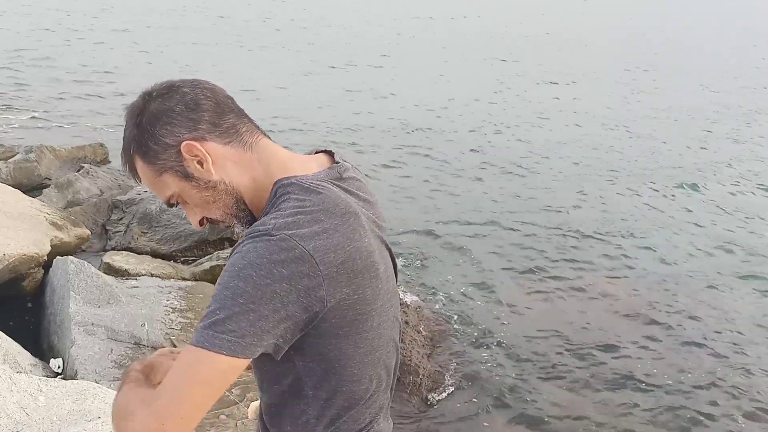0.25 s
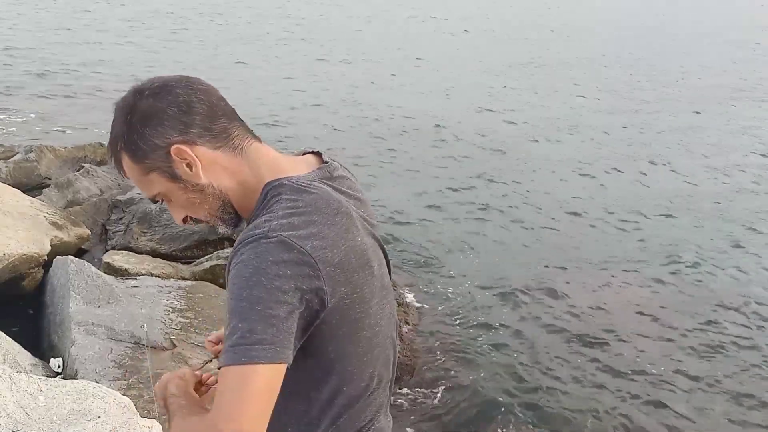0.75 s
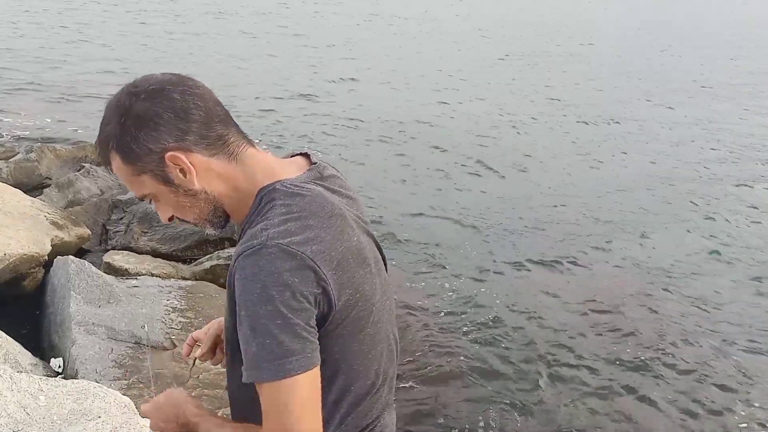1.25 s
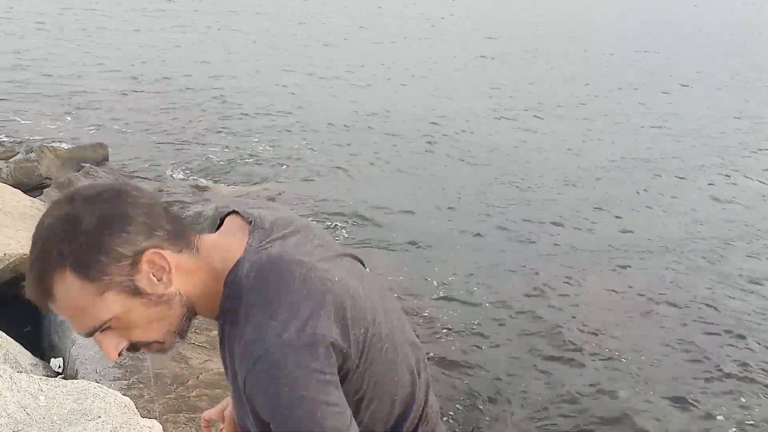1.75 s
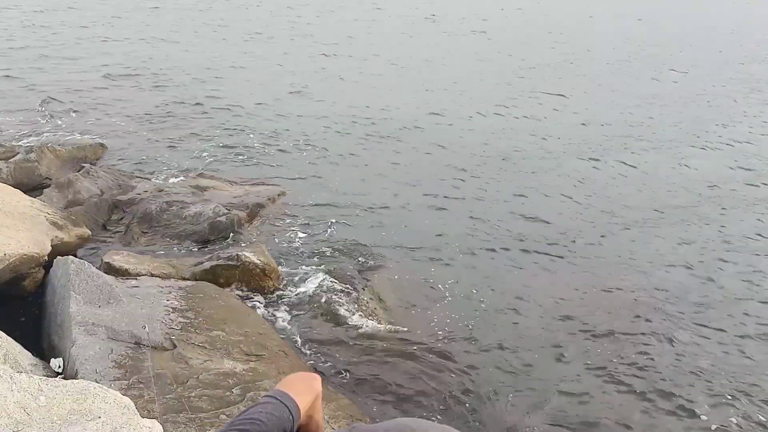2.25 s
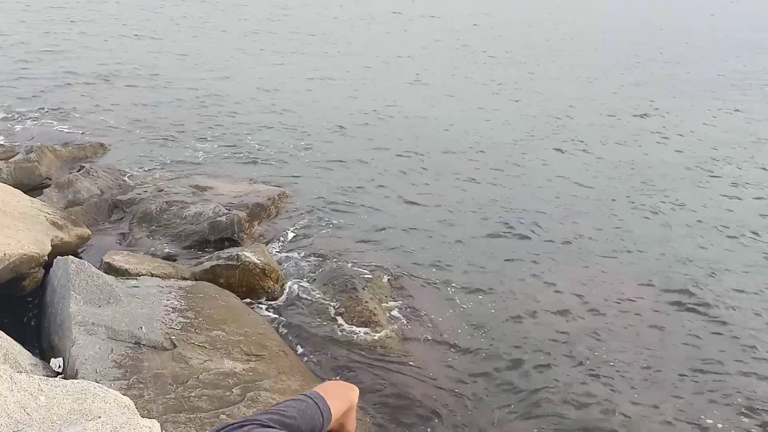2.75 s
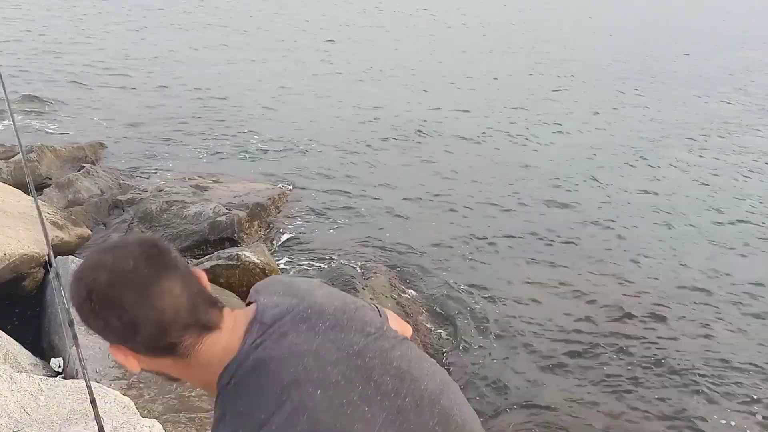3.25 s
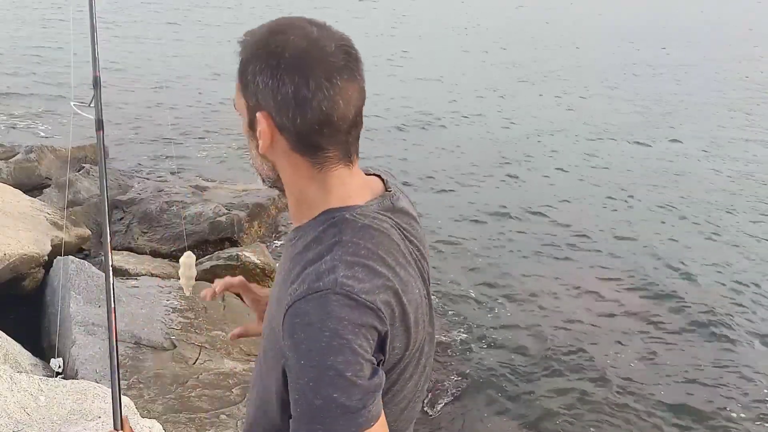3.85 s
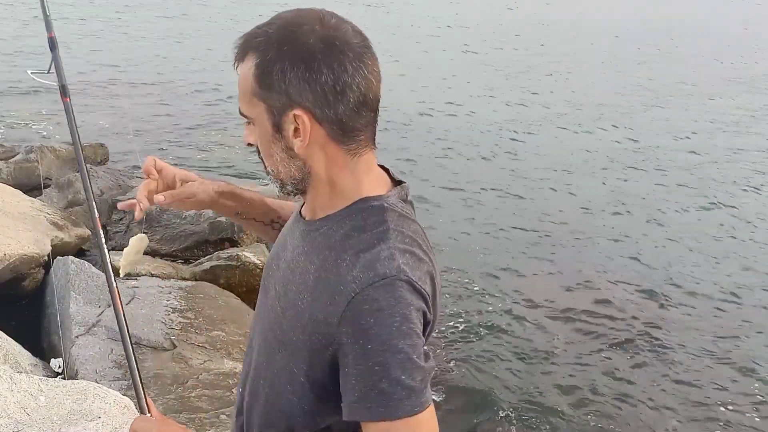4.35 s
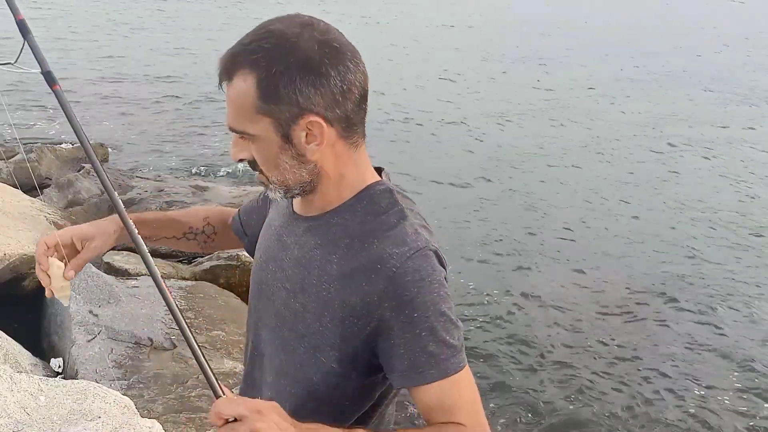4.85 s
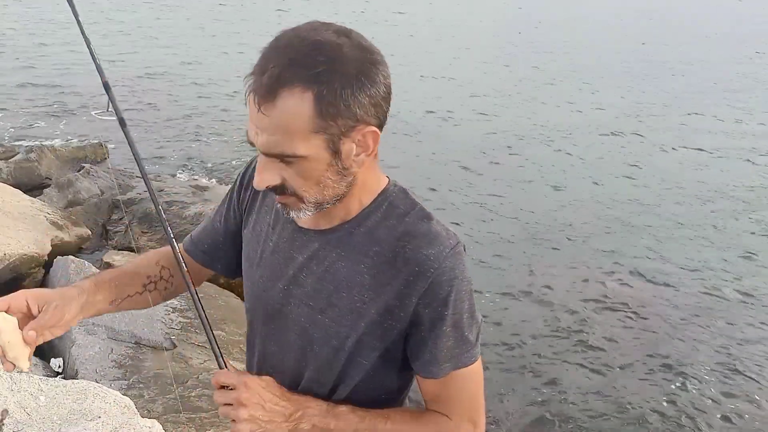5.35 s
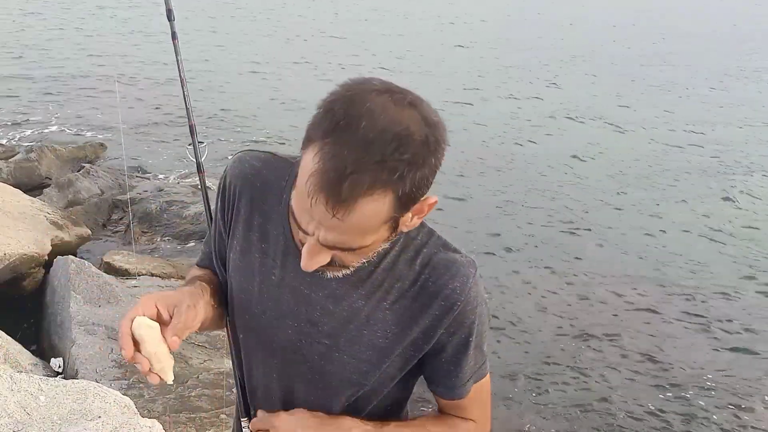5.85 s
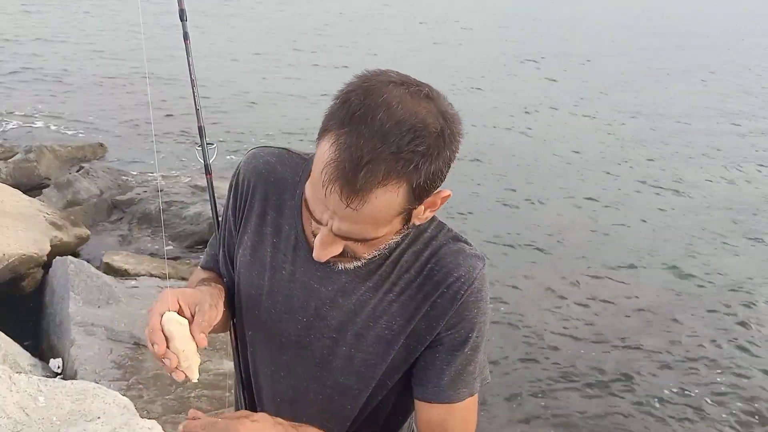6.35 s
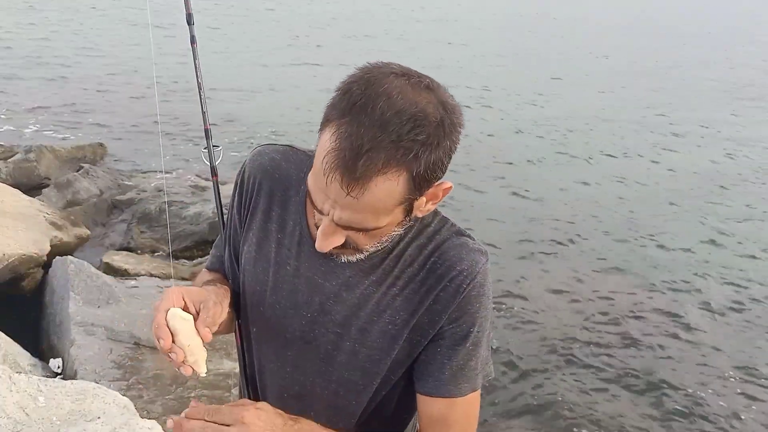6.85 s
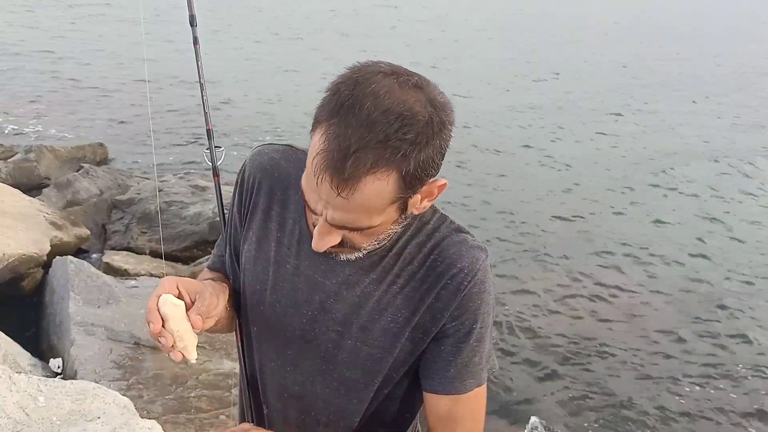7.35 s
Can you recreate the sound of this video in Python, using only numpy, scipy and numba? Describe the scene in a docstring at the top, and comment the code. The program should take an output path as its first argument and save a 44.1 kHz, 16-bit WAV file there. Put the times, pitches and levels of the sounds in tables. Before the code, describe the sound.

Gentle water washes among rocks, bubbling and plopping in uneven bursts, with crisp drips, a few tiny metallic ticks and soft breeze rumble.

```python
"""Among the rocks of a breakwater, small waves lap a few metres below two spaced microphone ports.
Filtered noise makes the wash, the breeze and the faint top hiss with its ticks; level curves move them.
Damped oscillators make the plops of trapped air, swarms of small bubbles, drops on stone,
pings of fishing tackle and thumps of wind; short noise bursts add slap and spit."""
import sys
import numpy as np
from scipy import signal
from scipy.fft import rfft, irfft, next_fast_len
from scipy.io import wavfile
from scipy.ndimage import uniform_filter1d
from numba import njit

SR = 44100
rng = np.random.default_rng(int(sys.argv[2]) if len(sys.argv) > 2 else 0)


def bounce(signal):
    """Save signal as a 16-bit WAV file at the path given by the first command-line argument."""
    frames = np.transpose(np.atleast_2d(signal))
    limited = np.clip(frames, -1, 1)
    pcm = np.round(limited * 32767).astype(np.int16)
    wavfile.write(sys.argv[1], SR, pcm)


N = 335601
PADDED = next_fast_len(N)  # transform length

# Strength of the breeze: (time [s], relative level [dB])
GUST_CURVE = [(0.0, -45.5), (0.45, -55), (1.0, -47), (1.7, -50), (1.95, -52), (2.45, -57), (3.0, -42),
              (3.3, -49), (3.5, -45), (4.1, -42.5), (4.45, -53.5), (4.8, -45), (5.45, -52), (5.72, -40),
              (5.95, -46), (6.45, -49), (7.0, -50), (7.61, -51.5)]
# Spectrum of the wind turbulence: (frequency [Hz], relative density [dB per Hz])
WIND_SPECTRUM = [(12, -56.5), (20, -19), (81, 5.5), (129, -1.5), (171, -4), (260, -10), (340, -35),
                 (570, -120)]
# Puffs of wind thumping the ports: (time [s], peak level [dB], pitch [Hz], left minus right [dB])
WIND_THUMPS = [(0.138, -36, 72.7, -11), (0.217, -33.5, 137, -17), (0.241, -35, 189, -5),
               (2.885, -34, 199, 1), (2.955, -32, 96.9, 11), (3.135, -32.5, 108, -17),
               (3.474, -34, 118, -13), (3.495, -32.5, 117, 3), (3.708, -32.5, 88.8, 17),
               (5.688, -31, 88.8, -8), (5.727, -29.5, 113, 15), (6.204, -27, 180, -1), (6.42, -29, 90, 1),
               (6.447, -33, 143, -16), (7.104, -39, 70, -10), (7.326, -38, 95, -23)]
# Spectrum of the faint top hiss: (frequency [Hz], relative density [dB per Hz])
TOP_HISS_SPECTRUM = [(4820, -26.5), (8200, -4.5), (10400, -12), (12600, -11), (14200, -2.5), (15200, -10.5),
                     (15800, -3.5)]
# Bright brief ticks, stronger on the right: (time [s], relative level [dB])
TOP_TICKS = [(2.0233, -65), (2.7237, -68), (2.7561, -65), (3.0465, -66.5), (5.5762, -52), (5.8394, -64),
             (6.3126, -74), (6.55, -67), (6.9711, -58), (7.25, -68)]
# A small metal part of the tackle pings: (time [s], peak level [dB])
TACKLE_PINGS = [(1.8864, -37.5), (2.7092, -37.5), (2.7234, -40.5), (2.7571, -25.5), (2.7851, -40),
                (4.7785, -40), (5.435, -43), (5.806, -34.5), (5.9933, -39.5)]
# Directions of the waterside noise: (direction [-1 right to 1 left], relative level [dB])
SHORE_DIRECTIONS = [(-1.1, 0), (-.9, 0), (-.6, -0.5), (-.3, -0.5), (0, -3), (.3, -4), (.6, -2), (.9, 0),
                    (1.1, 2.5)]
# Liveliness of the water, relative levels:
# (time [s], low gurgle [dB], middle trickle [dB], high fizz [dB])
WATER_CURVES = [(0.0, -49.5, -47, -47.5), (0.3, -45.5, -48.5, -48.5), (0.9, -47, -44, -46.5),
                (1.38, -48, -45, -48.5), (1.57, -41, -39, -45.5), (1.76, -47, -45, -48),
                (2.12, -39.5, -42.5, -44), (2.38, -47, -44.5, -45.5), (2.75, -47.5, -43.5, -46),
                (2.94, -44, -44.5, -42.5), (3.15, -44.5, -47, -46), (3.4, -47, -46.5, -46),
                (3.55, -42.5, -45.5, -44.5), (3.7, -44.5, -44.5, -43.5), (4.05, -42.5, -46.5, -44.5),
                (4.4, -43, -43, -44), (4.78, -40, -43, -44.5), (4.95, -40, -40.5, -45),
                (5.38, -43.5, -43, -46), (5.55, -42.5, -40.5, -40.5), (5.68, -39, -42.5, -42),
                (5.85, -44.5, -42, -38), (6.0, -45.5, -43, -44.5), (6.8, -48.5, -45.5, -44),
                (7.2, -45.5, -43, -43.5), (7.33, -47, -44, -41.5), (7.42, -41.5, -43.5, -43.5),
                (7.61, -45.5, -42, -42)]
# Spectrum of the wash: (frequency [Hz], relative density [dB per Hz])
WASH_SPECTRUM = [(71, -29.5), (120, -1), (228, -6.5), (501, -2), (568, 1.5), (692, 0), (873, -4),
                 (1080, 0.5), (1360, -1.5), (2510, -6.5), (4440, -19.5), (6230, -21.5), (7320, -28.5),
                 (7730, -31.5), (8600, -83.5), (11200, -109), (18900, -120)]
# Drops and splashes striking stone:
# (time [s], peak level [dB], pitch [Hz], spit share [0-1], nominal 60 dB decay time [s])
STONE_DROPS = [(0.7465, -26, 2390, 0.15, .004), (1.3746, -30.5, 2150, .1, .01), (1.924, -26, 1740, 0, .005),
               (2.027, -29, 1730, .6, .005), (2.0675, -28, 1780, 0.2, .01),
               (2.069, -30.5, 2400, 0.18, 0.0065), (2.2002, -27, 3040, 0.23, .008),
               (2.228, -34, 1580, 0.5, 0.024), (2.4184, -32, 3250, 0.1, 0.0065),
               (2.6902, -29, 1150, 0.15, 0.006), (2.7425, -23.5, 2050, .06, 0.0034),
               (2.7605, -25.5, 1950, 0.18, .022), (2.769, -34, 1900, 0, .02),
               (2.9696, -31.5, 2320, .03, .015), (3.0158, -32, 2710, 0.36, .01),
               (3.146, -36, 2580, 0.47, 0.0091), (3.597, -29.5, 1820, 0.36, .01),
               (4.4162, -29, 2450, 0.5, .005), (4.5336, -31, 2870, 0.1, .012),
               (5.0155, -36, 2750, 0.2, .012), (5.0626, -29.5, 4200, 0.08, 0.0066),
               (5.0638, -17, 2670, 0.05, 0.0016), (5.0685, -33, 2400, 0.1, .006),
               (5.436, -32.5, 1900, 0.5, 0.011), (5.447, -29.5, 1900, 0.07, 0.019),
               (5.4886, -28.5, 2290, 0.38, .012), (5.515, -27, 1870, 0.06, 0.016),
               (5.553, -34, 2770, .1, 0.011), (5.595, -31, 2100, 0.1, .015),
               (5.675, -23.5, 2420, 0.13, 0.008), (5.702, -28.5, 1850, 0.2, .02),
               (5.7598, -26, 2250, 0.38, .008), (5.8054, -26, 1880, 0.52, 0.0044),
               (5.849, -22, 2210, 0.04, 0.015), (5.856, -24, 1950, 0.05, 0.015),
               (5.961, -32, 1510, 0.4, 0.033), (6.0003, -26.5, 2250, 0.33, .005),
               (6.101, -33, 2240, 0.47, .012), (6.969, -37, 2300, 0.8, .008),
               (7.0294, -35, 1890, 0.6, 0.011)]
# Air pockets closing between rocks:
# (time [s], peak level [dB], pitch [Hz], slap share [0-1], nominal 60 dB decay time [s])
AIR_POCKETS = [(0.219, -30.5, 495, 0.03, 0.047), (0.285, -43, 266, 0, 0.12), (0.31, -43, 329, 0.1, 0.09),
               (0.335, -39, 200, 0.24, 0.09), (0.338, -39, 498, 0, 0.068), (0.395, -40, 476, 0.3, .07),
               (0.74, -35, 597, 0.36, 0.1), (0.744, -33, 986, 0.64, .05), (0.84, -34, 1110, .05, 0.066),
               (0.912, -35.5, 532, 0.1, 0.091), (0.94, -37, 593, 0, 0.069), (1.495, -36, 1095, 0.8, .05),
               (1.545, -29, 1075, 0.57, 0.047), (1.562, -32.5, 1044, 0, 0.11), (1.58, -38, 695, 0.2, 0.066),
               (1.615, -33.5, 684, 0.3, 0.063), (1.683, -33.5, 797, 0.53, 0.06),
               (1.69, -34.5, 567, 0.43, 0.1), (1.917, -36, 442, 0.34, 0.1), (2.091, -25.5, 424, 0, 0.059),
               (2.137, -24, 439, 0, .06), (2.157, -27, 314, 0.47, .055), (2.198, -24, 304, 0.32, 0.059),
               (2.208, -27.5, 564, 0.4, 0.067), (2.865, -31, 306, 0.53, 0.067), (2.895, -38, 233, 0.4, .09),
               (2.915, -35, 772, 0, .12), (3.026, -37.5, 331, 0.34, 0.083), (3.517, -34.5, 285, .3, 0.067),
               (3.526, -35.5, 540, 0.1, 0.076), (3.554, -33.5, 476, 0.16, 0.072),
               (4.01, -33, 273, 0.5, 0.064), (4.22, -34.5, 903, .1, 0.079), (4.582, -28, 573, 0.3, 0.034),
               (4.602, -36, 547, 0.4, .05), (4.697, -33.5, 420, 0.1, 0.045), (4.711, -35, 576, 0, .05),
               (4.826, -36.5, 223, .6, 0.08), (4.942, -29.5, 803, .3, 0.06), (4.951, -29, 584, 0.26, 0.049),
               (4.963, -28, 560, 0.3, 0.065), (4.963, -31.5, 850, 0, 0.082), (5.032, -33, 830, 0.3, .04),
               (5.117, -32.5, 650, 0.56, 0.072), (5.311, -24.5, 412, 0.03, 0.065),
               (5.445, -37, 1170, .3, 0.068), (5.509, -26, 860, 0.22, 0.058),
               (5.5595, -22, 586, 0.26, 0.03), (5.566, -30, 405, 0.4, 0.064),
               (5.639, -34, 432, 0.36, 0.038), (5.655, -31.5, 518, 0.46, 0.083),
               (5.68, -35, 557, 0.8, 0.06), (5.708, -33.5, 470, 0.2, 0.031),
               (5.797, -33.5, 571, 0.8, 0.096), (5.825, -29.5, 330, 0.34, 0.067),
               (5.838, -19.5, 788, 0.27, 0.06), (5.84, -21, 1170, 0.42, 0.051), (5.845, -27, 321, 0, 0.085),
               (5.847, -23.5, 563, 0, 0.074), (5.96, -34.5, 785, 0, 0.1), (6.096, -32, 376, 0.4, 0.13),
               (6.201, -31, 556, 0, 0.05), (6.21, -29.5, 664, 0.05, 0.054), (6.216, -26, 367, 0.38, .075),
               (6.463, -24.5, 720, 0.5, 0.052), (7.2, -33, 1225, 0.4, 0.052), (7.222, -37.5, 582, 0, 0.09),
               (7.236, -34, 1400, 0.2, .03), (7.299, -33.5, 430, 0, 0.11), (7.355, -38, 630, .3, .12),
               (7.425, -34, 646, 0.1, .05), (7.443, -35, 457, 0.1, 0.046), (7.461, -34.5, 488, 0.4, 0.085),
               (7.53, -35, 800, 0.2, 0.061), (7.554, -32, 622, 0.3, 0.042), (7.59, -33, 820, 0, 0.071)]

PORT_LAG_S = .00037  # travel time from one port to the other
GUSTY_DB, GUSTS_PER_S = 1.6, 13  # limit and rate of the random flurries
TICK_RING_S = 0.072  # 60 dB decay time
PING_HZ, PING_RING_S = 4870, 0.014
NEIGHBOUR_DB, NEIGHBOUR_DB_PER_SLAP = -22, 19.5  # a wetter slap wakes the neighbouring pockets more
SWELL_PER_RING = 21.5  # cycles of build-up for each second of ring
SHARED_HZ = 5500  # above this both channels carry nearly the same water and tackle sound
WATER_TOP_HZ, TOP_HZ = 7150, 15500  # upper limits: water and tackle; whole scene


def undb(db):
    """Decibel law: amplitude gain is ten to the power of level over twenty."""
    return 10 ** (np.asarray(db) / 20)


def unit(x):
    """Normalization by the root mean square."""
    return x / np.sqrt(np.mean(x ** 2))


def curves(table):
    """Linear interpolation of a table's columns over time."""
    s, *columns = np.transpose(table)
    t = np.arange(N) / SR
    return [np.interp(t, s, c) for c in columns]


def colour(x, points):
    """Spectral shaping: each frequency is weighted by a curve of level over log frequency."""
    hz, db = np.transpose(points)
    f = np.maximum(np.fft.rfftfreq(PADDED, 1 / SR), 1)
    gain = undb(np.interp(np.log(f), np.log(hz), db, -140, -140))
    return irfft(rfft(x, PADDED) * gain, PADDED)[..., :N]


def walk(rate):
    """Random modulation: levels held 1 / rate s, smoothed twice, freed of slow drift; spread 1."""
    k = int(SR / rate)
    held = np.repeat(rng.standard_normal(N // k + 1), k)
    smooth = uniform_filter1d(uniform_filter1d(held, k), k)[:N]
    return unit(smooth - uniform_filter1d(smooth, size=3 * k))


def ports(diffuse):
    """Arrival-time difference: directional noise lags between ports, the diffuse share is uncorrelated."""
    side, db = np.transpose(SHORE_DIRECTIONS)
    noise = rng.standard_normal((len(side), N)) * undb(db)[:, None]
    late = [np.roll(x, int(round(d * PORT_LAG_S * SR))) for x, d in zip(noise, side)]
    directional = unit(np.array([noise.sum(axis=0), sum(late)]))
    d = np.clip(diffuse, 0, 1)
    return np.sqrt(1 - d) * directional + np.sqrt(d) * rng.standard_normal((2, N))


@njit
def oscillators(n, start, hz, t60, rise, glide, gain, lag):
    """Damped oscillation: each tone swells, decays and may glide up, with a lag between the ports."""
    out = np.zeros((2, n + 9000))
    for k in range(len(start)):
        fall = np.exp(-np.log(1000) / (t60[k] * SR))
        swell = np.exp(-1 / (rise[k] * SR))
        turn = 2 * np.pi * hz[k] / SR
        size, lack, phase = 1., 1., 0.
        for i in range(min(int(t60[k] * SR), 8000)):
            size, lack = size * fall, lack * swell
            phase += turn * (1 + glide[k] * i / (t60[k] * SR))
            v = size * (1 - lack) ** 2 * np.sin(phase)
            out[0, start[k] + i + max(-lag[k], 0)] += gain[0, k] * v
            out[1, start[k] + i + max(lag[k], 0)] += gain[1, k] * v
    return out[:, :n]


def ring(s, db, hz, pan_db, t60, rise, glide, side):
    """Peak-scaled damped tones: db is the envelope's top before panning; side 1 leads left, -1 right."""
    one = np.ones(len(s))
    t60, rise = np.clip(t60, .002, .18) * one, np.clip(rise, .0001, .03) * one
    ratio = rise * np.log(1000) / t60
    top = (2 / (2 + ratio)) ** 2 * (ratio / (2 + ratio)) ** ratio  # height that the envelope reaches
    gain = undb(db + np.array([pan_db * one, -pan_db * one]) / 2) / top
    lag = np.round(np.clip(side, -1, 1) * one * PORT_LAG_S * SR).astype(int)
    return oscillators(N, (s * SR).astype(int), hz * one, t60, rise, glide * one, gain, lag)


def bursts(s, db, t60, rise):
    """Exponential growth and decay: an envelope of quick swells that die away."""
    env = np.zeros(N + 9000)
    t = np.arange(9000) / SR
    for onset, level, decay in zip(s, db, t60 * np.ones(len(s))):
        a = int(onset * SR)
        env[a:a + 9000] += undb(level - 60 * t / decay) * (1 - np.exp(-t / rise))
    return env[:N]


def wind(db):
    """Turbulent pressure: low noise, nearly unrelated at the two ports, with flurries and thumps."""
    a, b, both = rng.standard_normal((3, N))
    drift_db = np.array([1.2 * walk(7.7) + 2.8, 3.1 * walk(12) - .6])  # left, right
    rumble = unit(colour(np.array([a, b]) + 0.27 * both, WIND_SPECTRUM)) * undb(drift_db)
    flurry_db = GUSTY_DB * np.tanh(walk(GUSTS_PER_S))
    s, peak_db, hz, pan_db = np.transpose(WIND_THUMPS)
    thumps = ring(s, peak_db, hz, pan_db, .042, .005, 0, 0)
    return rumble * undb(db + flurry_db) + thumps


def top_hiss(db):
    """Amplitude-modulated noise: faint hiss and ticks, stronger on the right."""
    hiss = unit(colour(ports(diffuse=0.99), TOP_HISS_SPECTRUM)) * undb([[-9], [4]])  # left, right
    s, tick_db = np.transpose(TOP_TICKS)
    flicker = undb(2.2 * walk(18))
    return hiss * (undb(db) * flicker + bursts(s, tick_db, TICK_RING_S, 0.0046))


def tackle():
    """Metal resonance: short decaying tones of constant pitch, slightly stronger on the right."""
    s, db = np.transpose(TACKLE_PINGS)
    return ring(s, db, PING_HZ, -1.5, PING_RING_S, 0.00017, 0, -.05)


def drops():
    """Impact excitation: a short high ring and a spit of hiss."""
    s, db, hz, share, t60 = np.transpose(STONE_DROPS)
    # middle pitches reach the left channel first, the others the right
    side = np.where((hz > 2150) & (hz < 3500), .95, -.2)
    spit = unit(colour(ports(diffuse=0.14), [(1200, -13.0), (2500, 3.5), (4500, -9), (7500, -12.0)]))
    hiss = bursts(s, db + 20 * np.log10(np.clip(share, .01, 1)), 0.13, 0.0005)
    return ring(s + 0.00037, db, hz, .4, t60, 0.00053, 0.13, side) + spit * hiss


def swarm(level_db, lo_hz, hi_hz, cycles, scatter_db, cap_db, gain_db, count):
    """Random superposition: many small bubbles, a few much louder; decay scales with period."""
    when, pitch, loudness, place, length = rng.random((count, 5)).T
    s = when * (N - 1) / SR
    hz = lo_hz * (hi_hz / lo_hz) ** pitch
    extra_db = np.minimum(-scatter_db * np.log(1 - loudness), cap_db)
    db = level_db[(s * SR).astype(int)] + gain_db + extra_db
    side = 2.15 * (place - .5)
    return ring(s, db, hz, 1.0 * side, cycles * (.5 + length) / hz, 0.78 / hz, 0.15, side)


def wash(gurgle_db, trickle_db, fizz_db):
    """Band-wise modulation: noise bands follow the water and flicker partly together, mostly each on its own."""
    noise = rfft(colour(ports(diffuse=0.22), WASH_SPECTRUM), PADDED)
    octave = np.log2(np.maximum(np.fft.rfftfreq(PADDED, 1 / SR), 1) / 125)
    shared = walk(11)
    scale = 1 / np.sqrt(np.mean(irfft(noise, PADDED) ** 2))
    out = 0
    for k in np.arange(0, 6.6, .5):  # bands half an octave apart
        window = np.cos(np.pi * np.clip(octave - k, -.5, .5)) ** 2
        band = irfft(noise * window, PADDED)[:, :N]
        # bands follow gurgle, trickle or fizz
        low, high = np.clip((3.2 - k) / 1.0, 0, 1), np.clip((k - 3.4) / 0.74, 0, 1)
        db = low * (gurgle_db + 5.0) + (1 - low - high) * (trickle_db + 3.5) + high * (fizz_db + 8.5)
        out = out + band * undb(db + 0.75 * shared + (2.5 - 1.43 * high) * walk(17))
    return scale * out


def plops():
    """Cavity resonance: an air pocket rings with its neighbours; the slap of water is broad noise."""
    s, db, hz, slap, t60 = np.transpose(AIR_POCKETS)
    crowd_db = NEIGHBOUR_DB + NEIGHBOUR_DB_PER_SLAP * slap
    swell = SWELL_PER_RING * t60 / hz  # lower, longer pockets build up more slowly
    pocket = ring(s, db, hz, 0, t60, swell, .2, -0.49)
    above = ring(s + 0.00486, db + crowd_db + 1.0, 1.5 * hz, 0, 1.5 * t60, swell, 0.28, -0.22)
    below = ring(s + 0.00387, db + crowd_db, 0.418 * hz, 0, 0.88 * t60, swell, 0.28, -.2)
    slap_points = [(200, -12.0), (500, 0.0), (1200, -2.0), (2500, -9.5), (7000, -26.0)]
    water = unit(colour(ports(diffuse=0.24), slap_points))
    slap_db = db + 20 * np.log10(np.clip(slap, .01, 1))
    return pocket + above + below + water * bursts(s + 0.0024, slap_db, 3.2 * t60, 0.0019)


def shared_treble(sound):
    """Channel coupling: alike treble in both channels, louder right, under a steep upper limit."""
    hz = np.fft.rfftfreq(PADDED, 1 / SR)
    left, right = rfft(sound, PADDED)
    shared = 1 / (1 + np.exp((SHARED_HZ - hz) / 150.))
    lean = undb(1.18 - 6.5 * np.clip((hz - 4400) / 1600, 0, 1.6))  # gain of the left channel
    left = lean * ((1 - .6 * shared) * left + .9 * shared * right)
    low_pass = signal.butter(10, WATER_TOP_HZ, fs=SR, output="sos")
    return signal.sosfilt(low_pass, irfft([left, right], PADDED)[:, :N])


def scene():
    """Superposition of wind, top hiss and tackle with the water below."""
    gurgle, trickle, fizz = curves(WATER_CURVES)
    hiss_db = 1.8 * (fizz + 44) - 80.5  # the top hiss rises faster than the fizz
    background = wind(*curves(GUST_CURVE)) + top_hiss(hiss_db)
    glugs = swarm(gurgle, 260, 1000, 13, 3, 6.5, -3.5, count=1700)
    drips = swarm(trickle, 800, 2200, 24, 3.8, 10, -1.5, count=1700)
    crackle = swarm(fizz, 1800, 3800, 26, 3.8, 12, -3, count=1100)
    prickle = swarm(fizz, 3590, 7050, 24, 4.7, 9.3, -6.5, count=1200)
    small_bubbles = glugs + drips + crackle + prickle
    water = wash(gurgle, trickle, fizz) + small_bubbles + plops() + drops()
    return background + shared_treble(tackle() + water)


def record(dry):
    """Band limitation: a high-pass thins the deepest bass and an elliptic low-pass cuts the top."""
    dry = signal.sosfilt(signal.butter(2, 45, "high", fs=SR, output="sos"), dry)
    return signal.sosfilt(signal.ellip(10, .2, 80, TOP_HZ, fs=SR, output="sos"), dry)


dry = scene()
out = record(dry)
bounce(out)
```